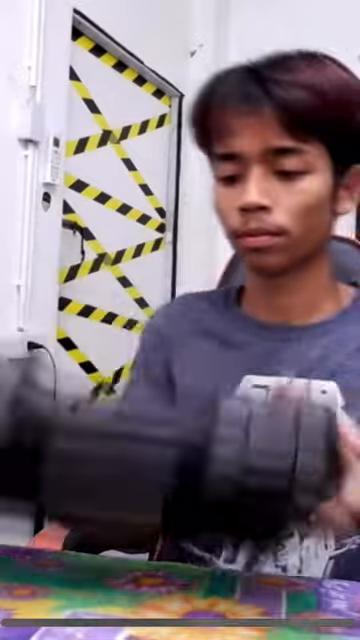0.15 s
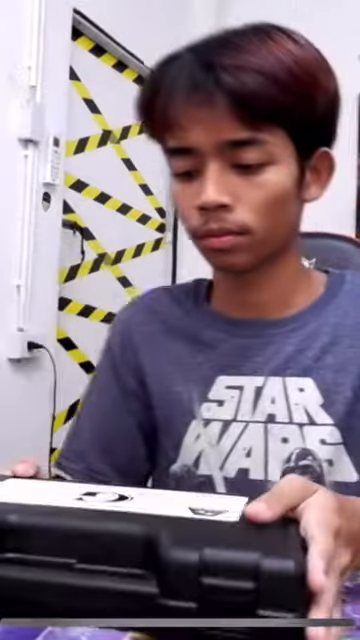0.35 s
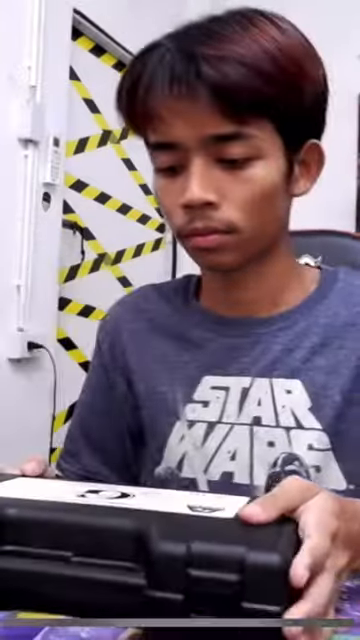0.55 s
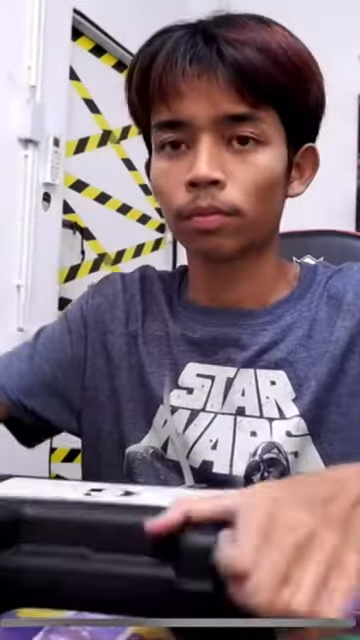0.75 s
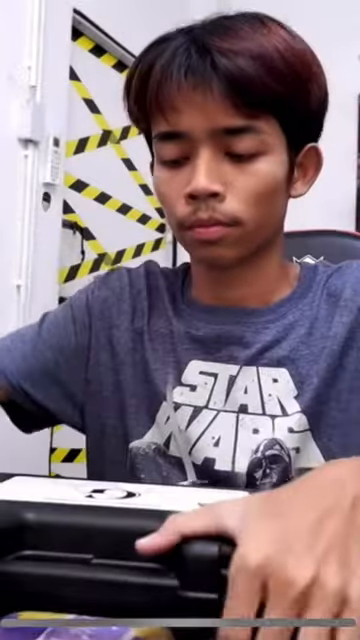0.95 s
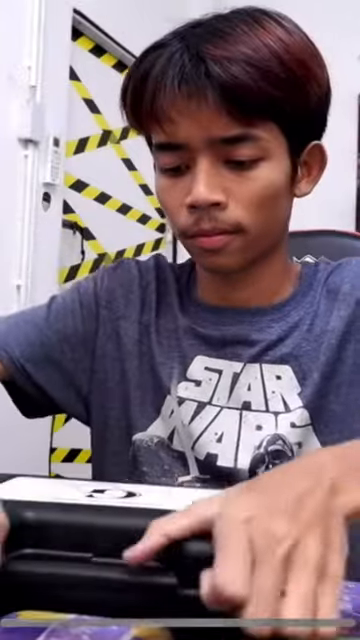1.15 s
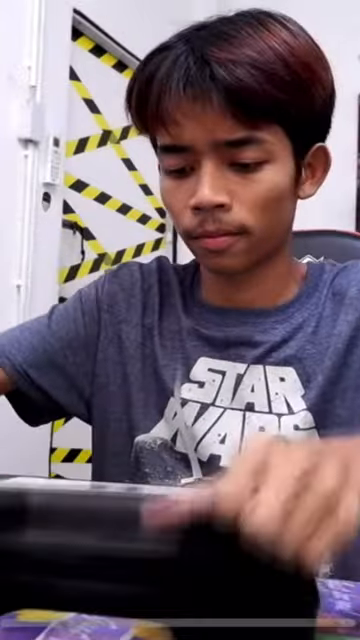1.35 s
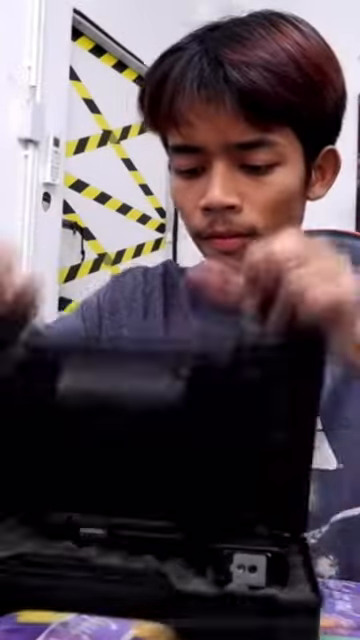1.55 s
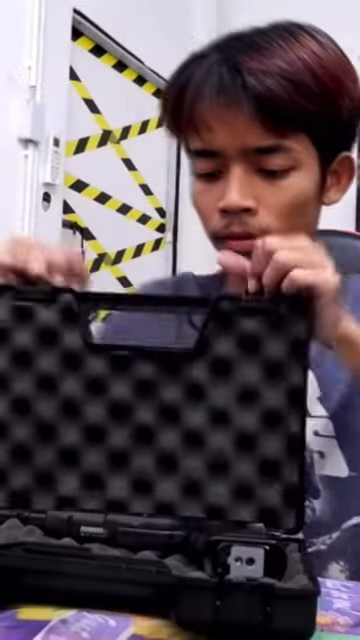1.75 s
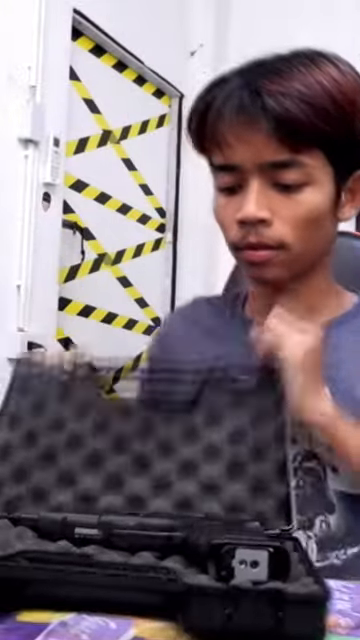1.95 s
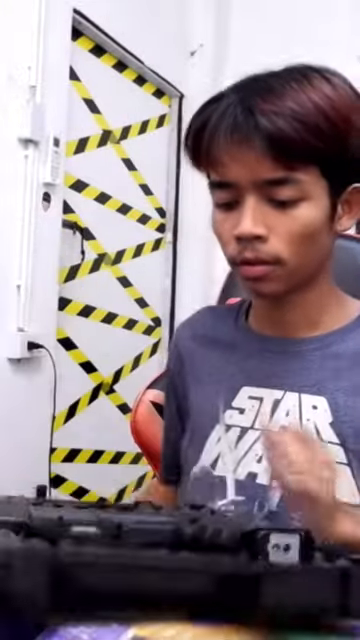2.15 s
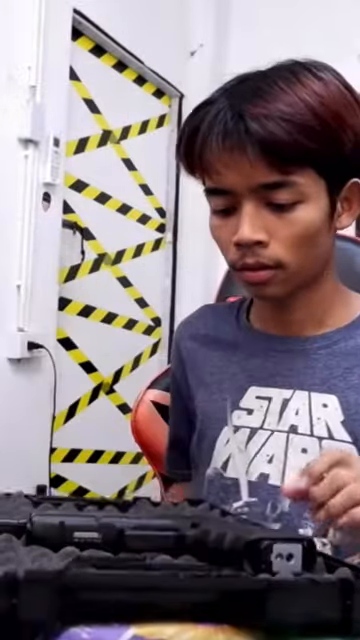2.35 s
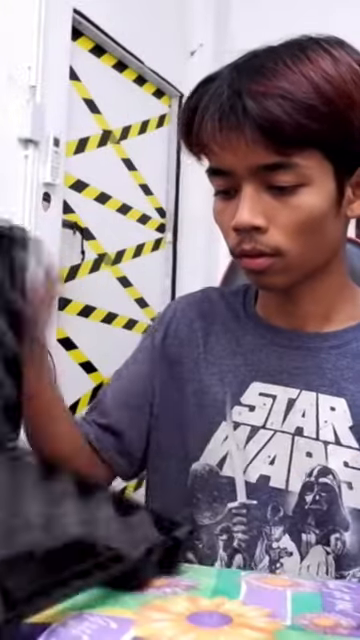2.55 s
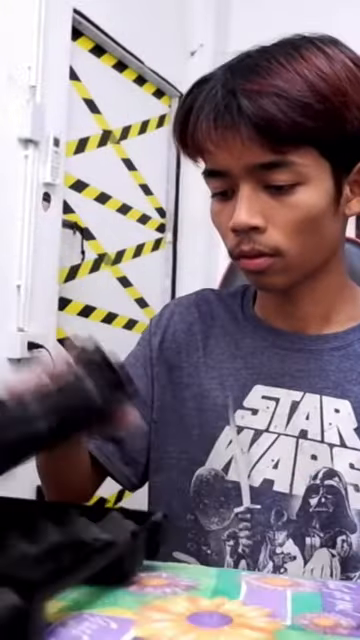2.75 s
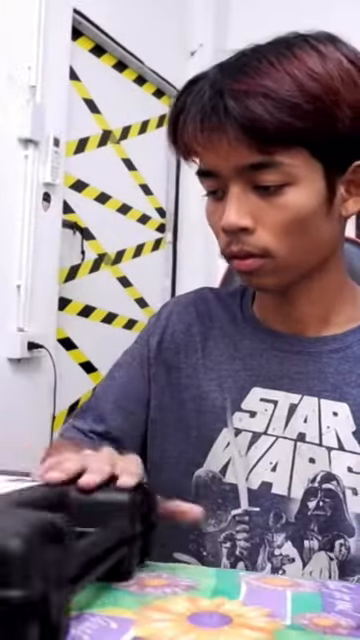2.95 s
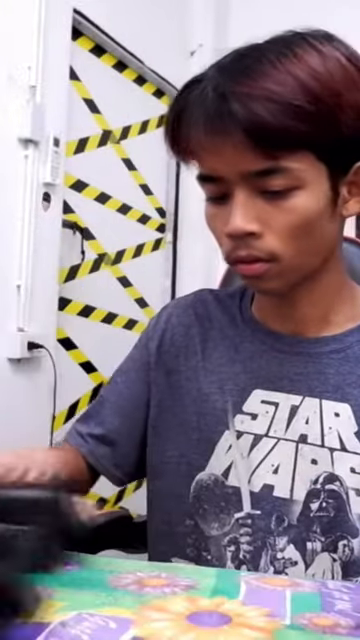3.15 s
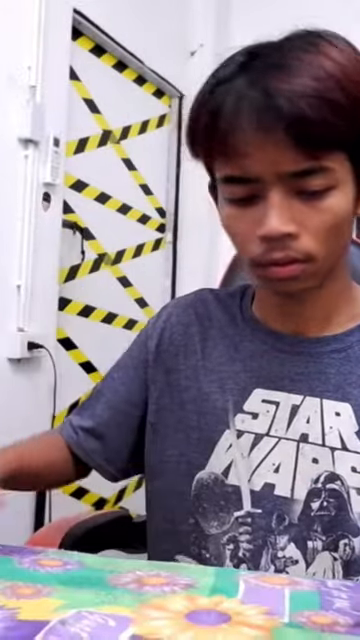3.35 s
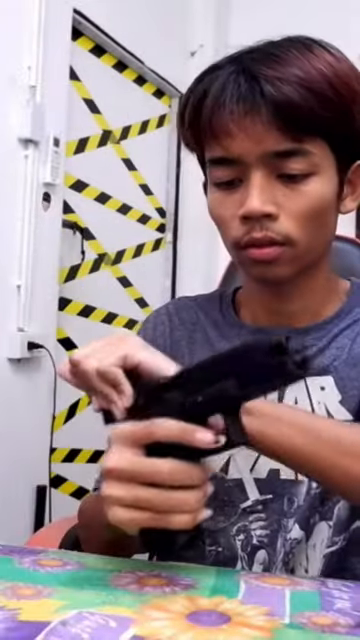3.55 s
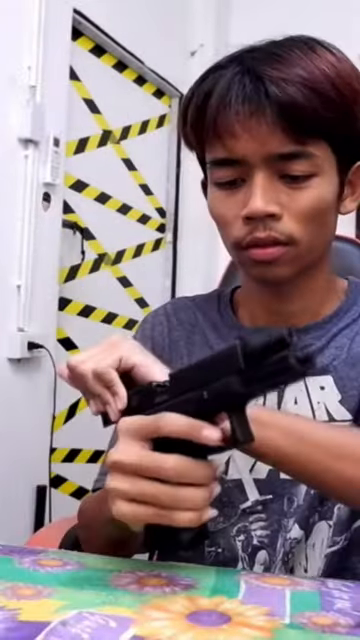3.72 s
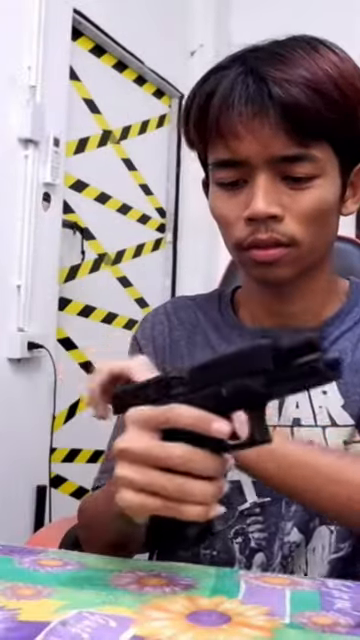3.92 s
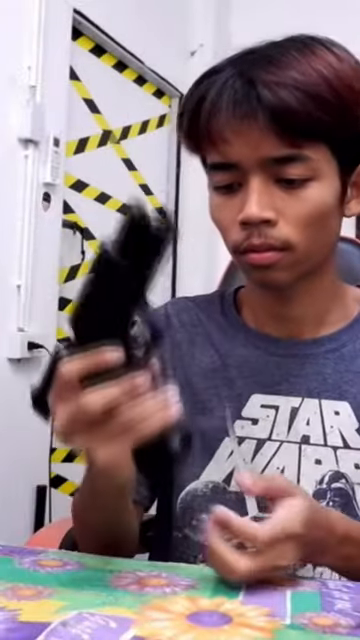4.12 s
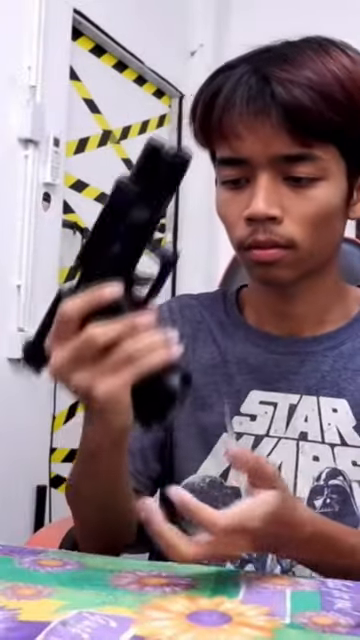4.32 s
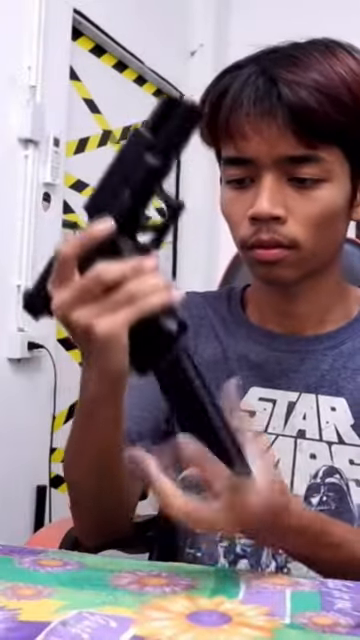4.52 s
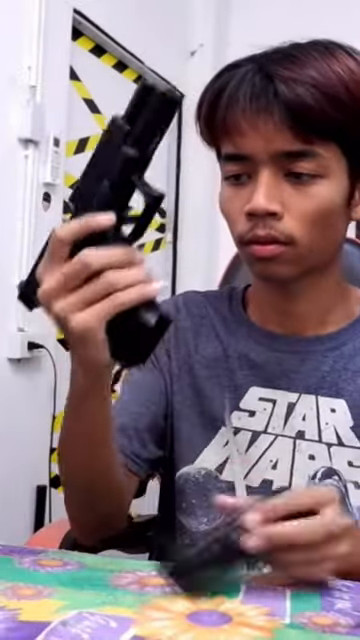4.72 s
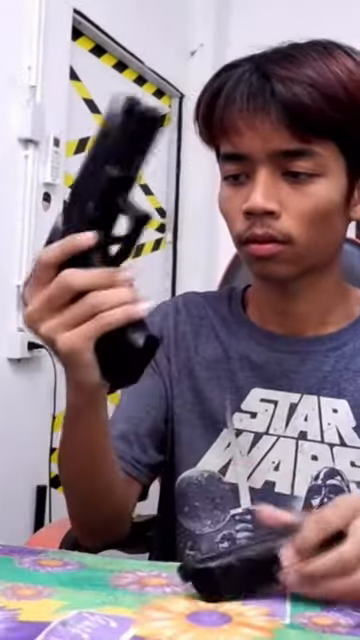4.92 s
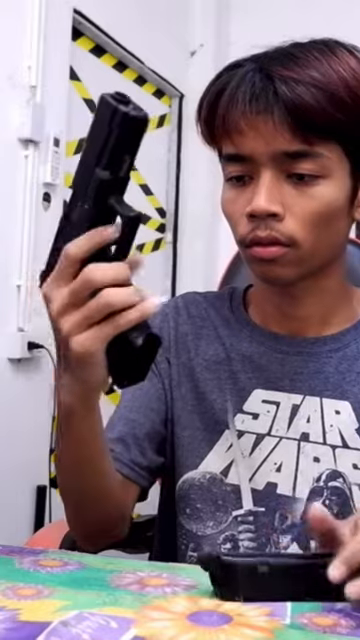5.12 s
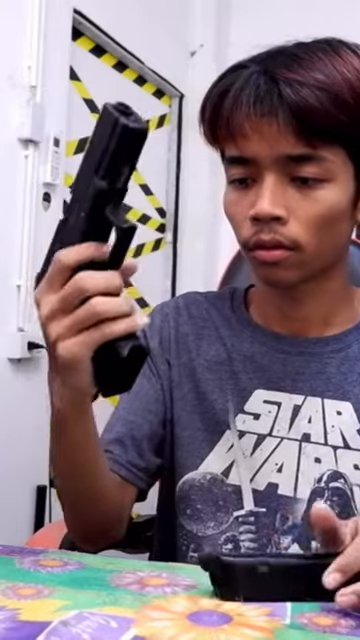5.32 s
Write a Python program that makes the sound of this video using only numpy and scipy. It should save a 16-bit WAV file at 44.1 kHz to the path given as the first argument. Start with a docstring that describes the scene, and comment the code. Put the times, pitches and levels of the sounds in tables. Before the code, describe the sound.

Indoors, close plastic knocks, latch snaps and scrapes of a hard case give way to bright pistol clicks and a loud final slide snap over low hum.

```python
"""A hard plastic case is set on a cloth-covered table, unlatched, opened, shut and pushed aside, with two thin
squeaks near the end; then a toy pistol's slide is racked, its magazine slides out and the slide snaps home.
Each blow is a short noise crack that rings the object's modes; sliding is dense grains through the same modes.
A small room answers with decaying noise. A broadband hum runs beneath: it sinks as the pistol is first handled,
returns abruptly, then sinks again and stays low. A nearly mono phone clips peaks and cuts the top."""
import sys
import numpy as np
from scipy import signal
from scipy.fft import rfft, irfft
from scipy.io import wavfile
from scipy.ndimage import uniform_filter1d

SR = 44100
rng = np.random.default_rng(int(sys.argv[2]) if len(sys.argv) > 2 else 0)


def persist_wave(psi):
    """Save psi, clipped to +-1, as 16-bit WAV."""
    counts = np.round(np.clip(psi, -1, 1) * 32767).astype(np.int16)
    wavfile.write(sys.argv[1], SR, np.atleast_2d(counts).T)


N = 241708


def undb(db):
    """Decibel law: level to amplitude ratio."""
    return 10 ** (np.asarray(db) / 20)


def unit(x):
    """Normalisation to an rms of one."""
    return x / np.sqrt(np.mean(x ** 2))


def decay(t, t60):
    """Exponential decay: the amplitude falls by 60 dB in t60 seconds."""
    return np.exp(-np.log(1000) * t / t60)


def walk(rate_hz):
    """Random modulation: levels held 1 / rate_hz seconds and smoothed twice, with a spread near 1."""
    hold = int(SR / rate_hz)
    steps = np.repeat(rng.standard_normal(N // hold + 1), hold)
    return 1.67 * uniform_filter1d(uniform_filter1d(steps, hold), hold)[:N]


def bands(edges_hz):
    """Band splitting: band-pass filters between neighbouring edges."""
    return [signal.butter(3, pair, "band", fs=SR, output="sos") for pair in zip(edges_hz, edges_hz[1:])]


def ring(modes, chance, scatter_db=3., detune=.02):
    """Modal superposition: one strike sums damped sines, each randomly weighted and detuned a little."""
    hz, db, t60 = (column[:, None] for column in np.transpose(modes))
    gain_chance, pitch_chance = chance[0][:, None], chance[1][:, None]
    t = np.arange(SR // 6) / SR
    gain = undb(db + scatter_db * gain_chance) * decay(t, t60)
    return np.sum(gain * np.sin(2 * np.pi * hz * (1 + detune * pitch_chance) * t), axis=0)


def blows(times, band_db, contact_ms, modes, edges_hz, crack_db, rise, rung):
    """Impact excitation: a rough contact cracks and rings the modes, with a set peak level in each band.

    Row 0 is the direct sound; row 1 feeds the room: `rung` times that sound plus an even click of equal energy."""
    out, filters, lead = np.zeros((2, N + SR)), bands(edges_hz), SR // 50
    t_ms = (np.arange(SR // 16) - lead) * 1000 / SR
    click = np.where(np.arange(SR // 25) == lead, 1., 0.)
    for s, levels_db, ms in zip(times, band_db, np.maximum(contact_ms, .2)):
        # a weaker graze surrounds the full contact
        graze = undb(-13.5) * np.exp(-np.abs(t_ms) / 1.27)
        # rise is the ratio of the contact's rise time to its fall time
        press = np.exp(np.minimum(-t_ms / ms, t_ms / (rise * ms)))
        contact = rng.standard_normal(len(t_ms)) * (graze + press)
        body = ring(modes, rng.standard_normal((2, len(modes))))
        body[0] += undb(crack_db)  # an impulse passes the contact noise unrung
        sound = signal.fftconvolve(body, contact)
        at = int(s * SR) - lead
        for k, (sos, db) in enumerate(zip(filters, levels_db)):
            part, even = signal.sosfilt(sos, sound), signal.sosfilt(sos, click)
            sign = (-1) ** k  # alternate signs join the bands without a notch
            part *= sign * undb(db) / np.abs(part).max()
            out[:, at:at + len(part)] += part * np.array([[1], [rung]])
            equal_energy = np.sqrt(np.sum(part ** 2) / np.sum(even ** 2))
            out[1, at:at + len(even)] += sign * even * equal_energy
    return out[:, :N]


def rub(strokes, fade_db, modes, grain_db, hiss_db, low_hz, high_hz, shift_db):
    """Stick-slip: dense uneven grains ring the modes at three places, each with its own modal weights."""
    t, level, sound = np.arange(N) / SR, np.zeros(N), 0
    for start, peak, end, db in strokes:
        swell_db = np.interp(t, [start, peak, end], [fade_db[0], 0, fade_db[1]])
        gate = np.interp(t, [start, start + .005, end - .02, end], [0, 1, 1, 0])
        level += undb(db + swell_db) * gate
    for place in rng.standard_normal((3, 2, len(modes))):
        # fast graininess, and a slower shift of strength among the places
        grains = rng.standard_normal(N) * undb(grain_db * walk(200) + shift_db * walk(30))
        body = ring(modes, place, scatter_db=5.)
        body[0] += undb(hiss_db)  # unrung part of the grains
        sound = sound + signal.oaconvolve(grains, unit(body))[:N]
    band = signal.butter(2, (low_hz, high_hz), "band", fs=SR, output="sos")
    return level * unit(signal.sosfilt(band, sound))


# blows on the case: start_s, level_db (peak of the second band), thud_db (lowest band, relative to level_db),
# sharpness_db (top band, relative to level_db)
KNOCKS = [(0.1038, -28, 0.5, -38), (0.2388, -9.5, 0.5, -20), (0.2442, -9.5, -6.5, -19.5),
          (0.2529, -20, 7, -13), (0.266, -19.5, 3, -11.5), (0.2781, -25.5, 14.5, 1), (0.2897, -13, -2, -22),
          (0.3075, -9.5, -8.5, -35), (0.7665, -10, -20.5, -16), (0.7858, -12, -8, -12.5),
          (1.0406, -12, -18.5, -15.5), (1.0467, -12.5, -46, -16), (1.0596, -2, -52, -17.5),
          (1.0742, -11, -5.5, -17), (1.1745, -19, -23, -21), (1.268, -31, -15, -32),
          (1.3391, -28, -12, -40), (1.36, -26, -20, -19), (1.3658, -25.5, -17, -14.5),
          (1.4138, -23.5, -5.5, -22), (1.747, -36, -2.5, -37), (1.9758, -15.5, -39, -16),
          (2.0571, -19, -17, -20.5), (2.08, -27, -24, -15), (2.0985, -21, -22, -11),
          (2.1456, -17, -6.5, -23), (2.1786, -20.5, -8, -13), (2.1869, -5, -22, -9), (2.309, -30, -3, -30),
          (2.4866, -23.5, -14, -25), (2.4946, -24.5, -21.5, -3.5), (2.618, -24.5, -37.5, -49),
          (2.6495, -24, -14, -37), (2.6822, -15.5, -47, -19), (2.6904, -22, -3.5, -10.5),
          (2.726, -12, -12.5, -15), (2.8917, -27.5, -28, -45), (2.928, -4, -8, -19.5),
          (2.9448, -2.5, -14, -24.5), (3.0265, -16, -12.5, -31), (3.0888, -25.5, -25, -19),
          (3.0987, -11.5, -23, -35), (3.1685, -26, -7, -40), (3.1847, -17.5, -10.5, -16)]
# limits of the four bands of a blow on the case: edge_hz
CASE_EDGES_HZ = (145, 560, 1500, 4700, 14500)
# modes of the plastic shell: pitch_hz, level_db (relative), t60_s
CASE_MODES = [(130, -29.5, 0.14), (211, 4.5, 0.055), (273.6, -0.5, 0.086), (377.4, 1, 0.089),
              (509, 0.5, 0.054), (645, -3.5, 0.061), (723.5, -5, 0.087), (844, 6, 0.037), (927, 2, 0.083),
              (1019, 3, 0.05), (1203, 9.5, 0.01), (1700, 10, 0.0032), (2270, 10.5, 0.0055),
              (2675, 0.5, 0.017), (2960, 4.5, 0.004), (3920, 7, 0.0037), (4800, 13, 0.0013),
              (5790, 9, 0.0072), (6460, 1.5, 0.025)]
# sliding strokes of the case: start_s, peak_s, end_s, level_db (at the peak);
# two rows have end_s before start_s, so their times are out of order for the interpolation
CASE_STROKES = [(.05, .11, 0.21, -44.5), (.25, .3, 0.43, -26.5), (1.28, 1.41, 1.2, -57),
                (1.86, 2.15, 2.7, -38), (2.22, 2.29, 2.17, -41), (2.48, 2.65, 2.79, -40),
                (2.74, 2.82, 3.3, -40), (3.08, 3.2, 3.33, -38.5), (3.34, 3.48, 3.54, -41)]
# stroke level relative to its peak: start_db, end_db
CASE_FADE_DB = (-10.5, -8.5)


def case():
    """Modal impact and friction: a hollow shell knocks and rubs, with squeaks and table thumps added."""
    start, level_db, thud_db, sharp_db = np.transpose(KNOCKS)
    edge_db = 9.5 + 0.66 * sharp_db  # a sharper blow has more edge in the third band
    contact_ms = 1 - 0.036 * level_db  # a stronger blow has a shorter contact
    band_db = np.transpose([level_db + thud_db, level_db, level_db + edge_db, level_db + sharp_db])
    knocks = blows(start, band_db, contact_ms, CASE_MODES, CASE_EDGES_HZ, crack_db=30.0, rise=0.62, rung=0.36)
    rubs = rub(CASE_STROKES, CASE_FADE_DB, CASE_MODES, grain_db=4.0, hiss_db=38.0,
               low_hz=424.0, high_hz=4630.0, shift_db=2.5)
    return knocks + rubs + squeaks() + thumps()


# thin squeaks: start_s, end_s, start_pitch_hz, end_pitch_hz, level_db (peak)
SQUEAKS = [(3.23, 3.247, 6360, 5930, -41), (3.27, 3.3, 5400, 5780, -47)]


def squeaks():
    """Frictional oscillation: plastic rubbing on plastic gives short gliding tones."""
    out = np.zeros(N)
    for start, end, start_hz, end_hz, db in SQUEAKS:
        n, at = int((end - start) * SR), int(start * SR)
        phase = 2 * np.pi * np.cumsum(np.linspace(start_hz, end_hz, n)) / SR
        out[at:at + n] = undb(db) * np.hanning(n) ** .5 * np.sin(phase)
    return out


# pushes on the table top: start_s, level_db (before the modal gains), push_ms
THUMPS = [(.24, -7, 2), (.285, 3, 2.67), (.486, -14.5, 2.22), (2.14, -20.5, 2.9), (2.678, -10, 4.3),
          (2.927, 5.5, 0.88), (2.945, -15, 1.8), (3.186, -14, 1.9), (4.937, -28, 4.4), (4.976, -22.5, 4.1),
          (5.022, -25, 3.1)]
# modes of the table top: pitch_hz, level_db (relative), t60_s
TABLE_MODES = [(89.5, 10, 0.064), (133.5, 9, 0.062), (209.4, 9.5, 0.078), (386, 20.5, 0.03),
               (466, 11, 0.049)]


def thumps(rise_ms=3.3):
    """Pulse-matched excitation: a push best rings the table modes whose half period equals its length."""
    out, t = np.zeros(N + SR), np.arange(SR // 4) / SR
    hz, mode_db, t60 = (column[:, None] for column in np.transpose(TABLE_MODES))
    envelope = undb(mode_db) * (1 - np.exp(-t * 1000 / rise_ms)) * decay(t, t60)
    swings = envelope * np.sin(2 * np.pi * hz * t)
    for start, db, push_ms in THUMPS:
        at = int(start * SR)
        fit = (2 * hz * push_ms / 1000) ** 2
        out[at:at + len(t)] += undb(db) * np.sum(swings * fit ** 2 * np.exp(-2 * fit), axis=0)
    return out[:N]


# clicks and longer slips of the pistol: start_s, level_db (peak of the third band), body_db (second band,
# relative to level_db), tick_db (top band, relative to level_db), contact_ms (fall time)
CLICKS = [(3.5293, -14, -20, -26, 1.2), (3.5757, -2.5, -13, 2, 1.8), (3.5963, -9, -16.5, 0, 7),
          (3.6253, -7.5, -30, -15, .5), (3.645, -7, -26, -19, 1.7), (3.6593, 1.5, -33, -4, .74),
          (3.6754, -2.5, -12.5, -13, .58), (3.8803, -14, -9.5, -8, 3.5), (3.9696, -23, -23, -17, 1.6),
          (4.0646, -14.5, -20, -12.5, 1.9), (4.4354, -32.5, 3, -23, 1.5), (4.5458, -23.5, -30, -6.5, 6),
          (4.5576, -27, -30, -5, 4), (4.586, -19.5, -35, -12, 6), (4.6218, -15, -6.5, -18, 2.6),
          (4.6285, -20.5, -5, -6, 2), (4.6968, -27.5, 0.5, -30, 1.8), (4.9407, 3.5, -10, -9, 1.9),
          (4.9463, -3, -15.5, -13.5, 1.2), (4.952, -14.5, -33, -4, 1.2), (4.9635, -10, -27, -2, 1.4),
          (4.9766, 0.1, -19, -2, 1.6), (4.9839, -10, -18, -10, 1.2), (5.237, -44.5, 2.5, -14, 1.2),
          (5.283, -5.5, -14, -3, 3.2), (5.3909, -27, -7.5, -9.5, .9)]
# limits of the four bands of a click: edge_hz
PISTOL_EDGES_HZ = (250, 900, 2000, 6500, 16000)
# modes of the pistol's parts: pitch_hz, level_db (relative), t60_s
PISTOL_MODES = [(1348, -1, 0.033), (2270, -10, 0.051), (2480, -2.5, 0.031), (3375, 1.5, 0.0086),
                (3960, 2.5, 0.0044), (4210, 4, 0.0061), (5370, -2.5, 0.012), (5920, -7, 0.016),
                (6900, 3.5, 0.0071), (8240, -9, 0.0037), (9050, -9, 0.016), (10500, -18, 0.029),
                (11000, -17, 0.071), (14740, -14, 0.014), (1083, -22.5, 0.27), (1345, -17.5, 0.22),
                (2570, -26, .09), (5600, -10, 0.029), (6470, -35, 0.065)]
# sliding strokes of the pistol: start_s, peak_s, end_s, level_db (at the peak)
PISTOL_STROKES = [(3.53, 3.62, 3.96, -32.5), (3.875, 3.89, 4.03, -36), (4.415, 4.47, 4.56, -37),
                  (4.48, 4.56, 4.64, -34), (4.6, 4.67, 4.77, -42), (4.935, 4.96, 5.8, -45)]
# stroke level relative to its peak: start_db, end_db
PISTOL_FADE_DB = (-11, -24)


def pistol():
    """Modal impact and friction: small stiff parts click brightly as slide and magazine scrape."""
    start, level_db, body_db, tick_db, contact_ms = np.transpose(CLICKS)
    thud_db = body_db - 17.5  # lowest band
    band_db = np.transpose([level_db + thud_db, level_db + body_db, level_db, level_db + tick_db])
    clicks = blows(start, band_db, contact_ms, PISTOL_MODES, PISTOL_EDGES_HZ, crack_db=31.5, rise=0.42, rung=1.0)
    scrapes = rub(PISTOL_STROKES, PISTOL_FADE_DB, PISTOL_MODES, grain_db=4.0, hiss_db=24.0,
                  low_hz=1440.0, high_hz=8900.0, shift_db=4.5)
    return clicks + scrapes


# reverberation by band: centre_hz, t60_s, level_db (relative)
ROOM = [(149, 0.44, -11.5), (505, 0.3, 1.5), (908, 0.35, 3.5), (2330, 0.39, -0.5), (3970, 0.077, 6),
        (6700, 0.24, 0.5), (10200, 0.33, 0)]


def room(dry, wet_db, gap_ms=11.):
    """Diffuse reverberation: reflections build up over a short gap and die away band by band."""
    t, tail = np.arange(SR // 2) / SR, 0
    for hz, t60, db in ROOM:
        sos = signal.butter(1, (hz / 1.6, min(hz * 1.6, .45 * SR)), "band", fs=SR, output="sos")
        tail = tail + undb(db) * signal.sosfilt(sos, rng.standard_normal(len(t))) * decay(t, t60)
    tail *= 1 - np.exp(-(t * 1000 / gap_ms) ** 2)
    unit_energy_tail = tail / np.sqrt(np.sum(tail ** 2))
    return undb(wet_db) * signal.fftconvolve(dry, unit_energy_tail)[:N]


# level of the background, which sinks, returns abruptly, then sinks and stays low: time_s, level_db
HUM_SINK = [(0, 4), (3.552, -2.5), (3.6, -13), (3.975, -12.5), (3.986, 1), (4.93, 1), (4.98, -15),
            (5.48, -15)]


def sink_db():
    """Level modulation: straight lines in decibels between the listed times."""
    return np.interp(np.arange(N) / SR, *np.transpose(HUM_SINK))


# spectral density of the hum: pitch_hz, level_db (per Hz, relative)
HUM = [(15, -51), (25, -18.5), (102, -6.5), (293, -8.5), (384, -8), (427, -8.5), (463, -12.5), (677, -9),
       (1190, -11), (1400, -19.5), (1740, -18.5), (4140, -28), (16000, -37)]


def hum():
    """Spectrally shaped noise: a broadband hum whose middle wavers more than its rumble and hiss."""
    hz = np.arange(N // 2 + 1) * SR / N + 1  # 1 Hz keeps the logarithm finite
    shape_hz, shape_db = np.transpose(HUM)
    shape = undb(np.interp(np.log(hz), np.log(shape_hz), shape_db))
    noise = unit(irfft(rfft(rng.standard_normal(N)) * shape, N))
    middle = signal.sosfiltfilt(signal.butter(1, (170., 1600.), "band", fs=SR, output="sos"), noise)
    sink = sink_db()
    wavering_middle = middle * undb(sink + 2 * walk(5.59))
    rumble_and_hiss = (noise - middle) * undb(1.05 * sink + 0.13 * walk(4.3))
    return undb(-47.5) * (wavering_middle + rumble_and_hiss)


def channel_hiss(hiss_db=-64.5, low_db=-73.0):
    """Opposite-phase noise: faint treble hiss and a little bass part the channels and sink with the hum."""
    treble = signal.butter(1, 4000., "high", fs=SR, output="sos")
    bass = signal.butter(2, 500., fs=SR, output="sos")
    hiss = unit(signal.sosfilt(treble, rng.standard_normal(N)))
    low = unit(signal.sosfilt(bass, rng.standard_normal(N)))
    sink = sink_db()
    return undb(hiss_db + 1.3 * sink) * hiss + undb(low_db + .6 * sink) * low


def scene():
    """Superposition: direct sounds, their reverberation and the hum in the middle, faint hiss at the sides."""
    case_direct, case_to_room = case()
    pistol_direct, pistol_to_room = pistol()
    case_sound = case_direct + room(case_to_room, wet_db=-8.5)
    pistol_sound = pistol_direct + room(pistol_to_room, wet_db=-14.0)
    mid = case_sound + pistol_sound + hum()
    side = channel_hiss()
    return np.array([mid + side, mid - side])


def record(dry):
    """Saturation and band limiting: the phone clips peaks at full scale, then cuts above 16.2 kHz."""
    low_pass = signal.ellip(10, .2, 90, 16200, fs=SR, output="sos")
    return signal.sosfilt(low_pass, np.clip(dry, -1, 1))


dry = scene()
out = record(dry)
persist_wave(out)
```